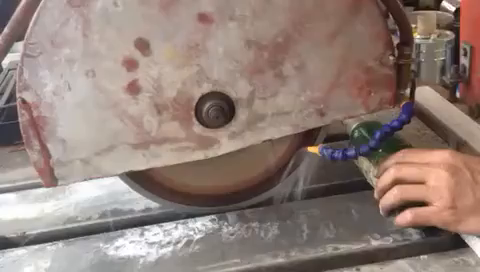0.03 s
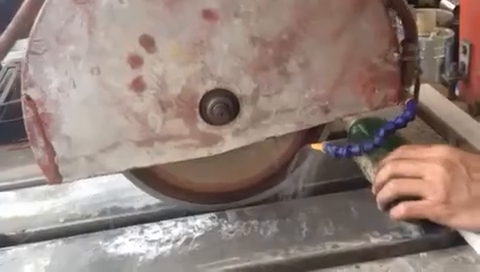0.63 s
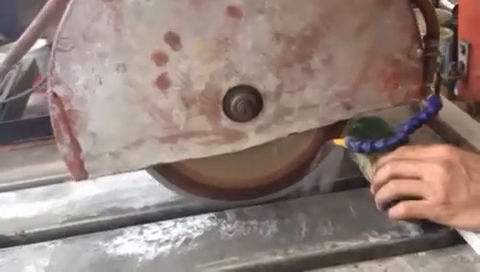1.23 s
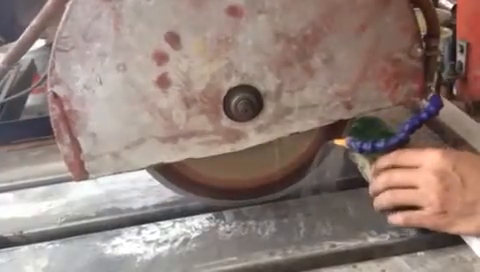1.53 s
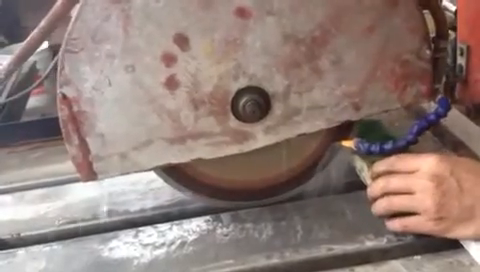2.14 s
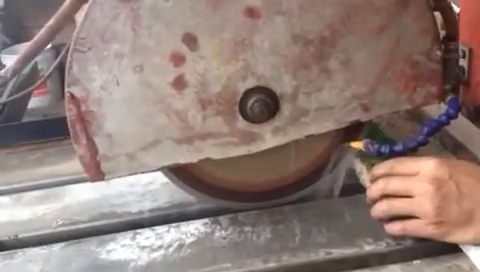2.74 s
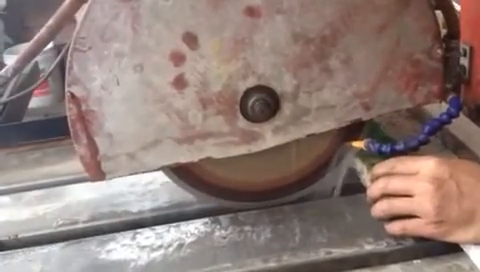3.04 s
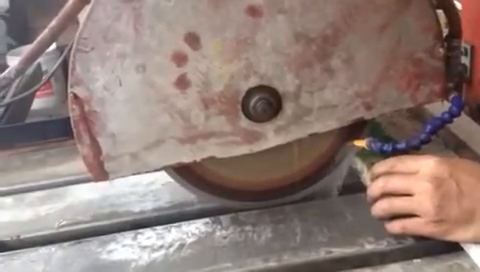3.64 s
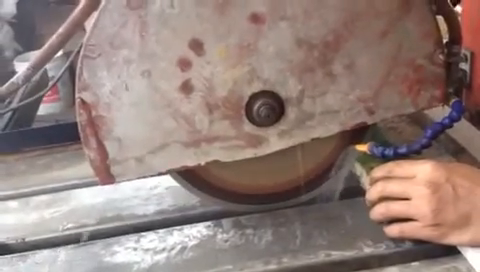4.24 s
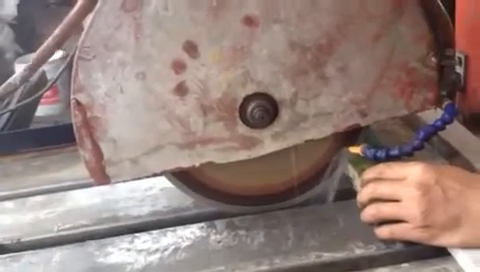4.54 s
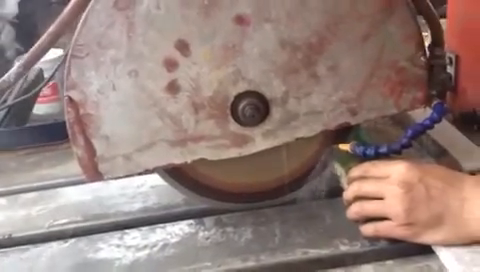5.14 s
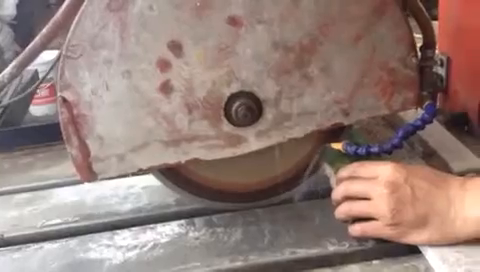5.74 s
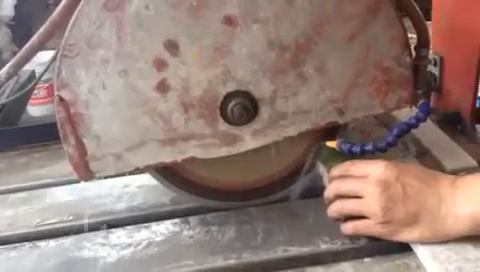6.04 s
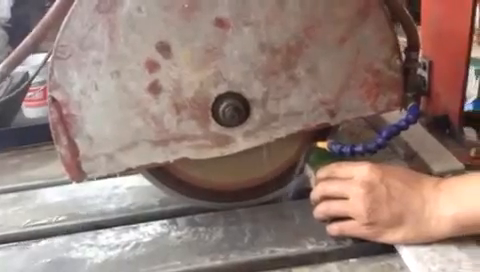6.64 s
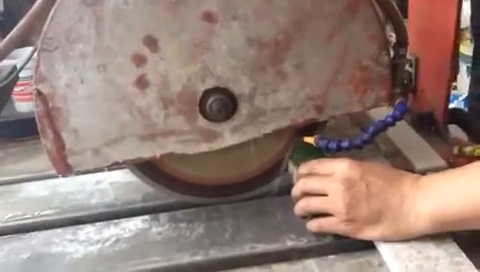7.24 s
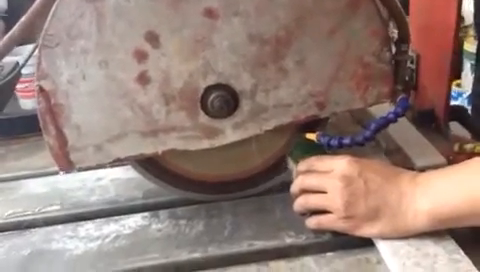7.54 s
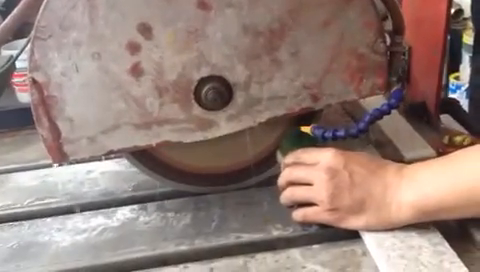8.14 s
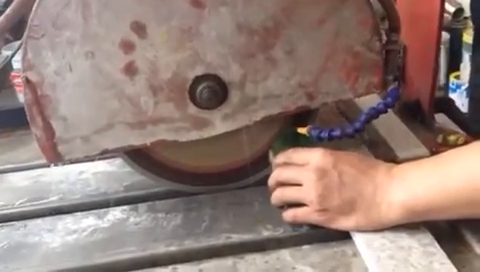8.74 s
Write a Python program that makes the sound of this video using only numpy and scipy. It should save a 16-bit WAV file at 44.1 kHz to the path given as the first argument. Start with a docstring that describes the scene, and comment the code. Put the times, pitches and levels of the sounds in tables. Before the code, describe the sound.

Motor hum and water hiss with a few glass knocks, then a cutting wheel bites a bottle, buzzing and screeching steadily.

```python
"""Cutting a glass bottle on a wet saw

A water-cooled diamond wheel idles while a bottle is slid and knocked into place on the steel table.
Then the rim bites. The same grit passes the glass on every turn, making a buzzing rasp that rings
wheel and bottle, and the bottle's wall sings with a whine that chokes now and then.
The push of the hand (the feed) and the depth of the slot set the level and colour of the cut."""
import sys
import numpy as np
from scipy import signal
from scipy.fft import rfft, irfft, next_fast_len
from scipy.io import wavfile
from scipy.ndimage import uniform_filter1d

SR = 44100
rng = np.random.default_rng(int(sys.argv[2]) if len(sys.argv) > 2 else 0)


def log_audio(samples):
    """Write samples as a 16-bit WAV file to the path given in sys.argv[1]."""
    # one column per channel
    frames = np.atleast_2d(samples).T
    # limit to full scale, then quantise
    limited = np.clip(frames, -1, 1)
    pcm = np.round(limited * 32767).astype(np.int16)
    wavfile.write(sys.argv[1], SR, pcm)


N = 388080

SPIN_HZ = 49.774   # turns of the wheel per second
BITE_S = 2.757   # the cut begins


# Colour of the rasp, and of the slurry (water and ground glass). Each row: pitch in Hz, relative dB.
RASP_COLOUR = [(60, -55), (500, -56), (800, -17.5), (1400, -7.5), (1850, -15), (2400, -19), (3560, -14.5),
               (4300, -6.5), (5150, -17.5), (5700, 1.5), (6800, 4), (7600, 4), (8400, -5), (9300, -13),
               (10400, -44), (15000, -19)]
SLURRY_COLOUR = [(100, -60), (4000, -29), (8000, -4), (9500, 1), (10400, -22), (12000, 1.5), (13500, 6.5),
                 (15200, 10)]
# Ringing notes of the steel wheel and of the bottle.
# Each row: pitch in Hz, width in Hz, relative dB in a shallow cut, relative dB in a deep cut.
WHEEL_NOTES = [(5710, 60, 1.5, 1), (6240, 70, -2.5, -2), (6340, 110, -26.5, -2), (6480, 60, -18, -1),
               (7030, 62, -22, 0), (7270, 85, 5.5, -18), (7780, 140, -26, 1), (8200, 83, -8, -21),
               (8600, 50, -8.5, -5.5), (11270, 56, -18, -15)]
BOTTLE_NOTES = [(845, 6.1, -8, -16), (1077, 140, -7, -11), (1272, 31, -5, -9), (1630, 41, -4, -16.5),
                (2244, 20, -15, -8), (2353, 16.7, 1, -1.5), (2492, 22, -6, -15), (2673, 65, -4.5, -3.5),
                (2897, 380, -4.5, -10), (3143, 41, 3.5, -12), (3410, 52, -13, -18), (3792, 64, -29, -5.5),
                (4175, 57, -23, -7.5), (4450, 75, -27, -12), (4593, 41, -1.5, 1), (4843, 24, 0.5, 2),
                (5740, 42, -24, -7)]
# First catches of the rim on the glass. Each row: start in seconds, level in dB.
RIM_CATCHES = [(2.741, -20), (2.7567, -10.5), (2.777, -19.5)]

def grinding(cutting):
    """The rim rasps on the glass, rings wheel and bottle, and throws off slurry."""
    unsteady_db = 0.45 * drift(14)
    rasp_db = cut_level(shallow_db=-14.5, deep_db=-15.5, feed_share=1) + unsteady_db
    bottle_db = cut_level(shallow_db=-18, deep_db=-19, feed_share=0.78) + unsteady_db
    slurry_db = cut_level(shallow_db=-24.5, deep_db=-25, feed_share=0.83) + unsteady_db
    slurry_db += 0.57 * (seconds() - BITE_S)   # slurry gathers in the slot
    pressure = rim_pressure(high_spots_db=1.5, runout_db=0.96, spot_hz=607)
    # fine grit wears away within a few turns, coarser grit lasts longer
    fine = pressure * grit(turns=7.6, chips_db=-4)
    medium = pressure * grit(turns=18.6, chips_db=-3.5)
    wheel = ring_in_cut(pressure * grit(turns=20, chips_db=5), WHEEL_NOTES, wander_db=3)
    rasp = rms_one(reflected(coloured(fine, RASP_COLOUR)) + from_db(-3) * wheel)
    bottle = ring_in_cut(medium, BOTTLE_NOTES, wander_db=1.38)
    slurry = pressure * noise(SLURRY_COLOUR)
    steady = from_db(rasp_db) * rasp + from_db(bottle_db) * bottle + from_db(slurry_db) * slurry
    steady += swelling_notes(grit(turns=32, chips_db=-11))
    catches = decays(*np.transpose(RIM_CATCHES), t60=0.054) * (rasp + from_db(-6.5) * bottle)
    splash = decays([BITE_S], [-22], t60=0.6) * slurry   # the first bite flings water off the glass
    return cutting * (steady + splash) + catches


# How hard the hand pushes the bottle in. Each row: time in seconds, dB above or below a steady cut.
HAND_FEED = [(2.82, -1.5), (2.89, -5.5), (2.97, -1), (3.04, -3.5), (3.09, -2), (3.18, -4), (3.44, -3),
             (3.8, -1), (4.02, 0.5), (4.2, 0.5), (5.6, -0.5), (6.2, 0.2), (6.47, -0.5), (6.66, 1.9),
             (6.87, -0.8), (7.8, .5), (8.12, 1.8), (8.45, -1), (8.8, 0.8)]

def cut_level(shallow_db, deep_db, feed_share):
    """Level in dB of a layer that follows the depth of the slot and the push of the hand."""
    return shallow_db + slot_depth() * (deep_db - shallow_db) + feed_share * in_time(HAND_FEED)


def slot_depth(start_s=3.33, settle_s=1.34):
    """The rim sinks into the glass ever more slowly, from 0 (shallow) towards 1 (deep)."""
    return 1 - np.exp(-np.maximum(seconds() - start_s, 0) / settle_s)


def rim_pattern(turns):
    """The rim's bumps come back on every turn and wear into new ones over about this many turns."""
    per_turn = round(SR / SPIN_HZ)
    fresh = rng.standard_normal((N // per_turn + 2, per_turn))
    keep = np.exp(-1 / turns)
    worn, _ = signal.lfilter([np.sqrt(1 - keep ** 2)], [1, -keep], fresh[1:], axis=0, zi=keep * fresh[:1])
    return worn.ravel()[:N]


def rim_pressure(high_spots_db, runout_db, spot_hz):
    """The rim presses unevenly: it has high spots and wobbles once a turn (runout)."""
    spots = rms_one(filtered(rim_pattern(turns=48), 2, spot_hz, "low"))
    wobble = np.sin(2 * np.pi * SPIN_HZ * seconds())
    return rms_one(from_db(high_spots_db * spots + runout_db * wobble))


def grit(turns, chips_db):
    """The grinding force: the returning rim bumps plus chips that break off at random."""
    return rms_one(rim_pattern(turns) + from_db(chips_db) * rng.standard_normal(N))


def ring_in_cut(force, notes, wander_db):
    """Grinding rings an object's notes; their strengths wander and shift as the slot deepens."""
    depth = slot_depth()
    out = 0
    for hz, width, shallow_db, deep_db in notes:
        db = shallow_db + depth * (deep_db - shallow_db) + wander_db * drift(2.016)
        out += from_db(db) * resonance(force, hz, width)
    return rms_one(out)


# Echoes off the table and inside the wheel's guard. Each row: delay in seconds, strength as a factor.
STEEL_ECHOES = [(.0023, 0.088), (.0047, 0.24), (.0083, .2)]

def reflected(x):
    """Nearby steel adds very short echoes that colour the sound."""
    return rms_one(x + sum(strength * np.roll(x, round(delay * SR)) for delay, strength in STEEL_ECHOES))


# Single notes that swell and fade in the cut: high screeches and one low hum.
# Each row: start in seconds, end in seconds, pitch in Hz, level in dB.
SWELLING_NOTES = [(3.5, 3.947, 3166, -24.5), (3.926, 4.08, 5740, -23), (3.903, 4.68, 7170, -25.5),
                  (4.303, 4.68, 3204, -26), (4.8, 5.127, 6640, -22), (5.345, 5.952, 5690, -21),
                  (5.45, 6.454, 350, -43), (5.75, 6.25, 6290, -24), (5.81, 5.934, 2660, -23.5),
                  (6.073, 6.222, 2660, -23), (6.333, 6.7, 3780, -29.5), (6.545, 7.258, 2272, -30.5),
                  (6.58, 6.79, 2648, -22), (6.896, 7.4, 6470, -23), (6.988, 8.5, 3865, -30.5),
                  (7.794, 8.2, 6560, -21.5), (8.3, 9.2, 4620, -25.5)]

def swelling_notes(force):
    """The returning grit rings single notes, each of which swells and fades."""
    out = np.zeros(N)
    for start, end, hz, db in SWELLING_NOTES:
        span = slice(int(start * SR), int(end * SR))
        ring = held(resonance(resonance(force[span], hz, width=43), hz, width=43), samples=SR // 12)
        swell = signal.windows.tukey(span.stop - span.start, 0.5)[:len(ring)]
        out[span] += from_db(db) * swell * ring
    return out


# Strength of the whine. Each row: time in seconds, relative level in dB.
WHINE_LEVELS = [(2.8, -40), (2.89, -38), (2.96, -19), (3.28, -21), (3.45, -24.5), (3.9, -27), (4.5, -23),
                (5.1, -20), (5.75, -25), (6.02, -29), (6.5, -26), (7.3, -25.5), (8.1, -29.5), (8.5, -32),
                (8.8, -44)]
# Brief chokes of the whine. Each row: middle in seconds, half length in seconds, loss in dB.
WHINE_CHOKES = [(3.03, 0.044, 12), (3.16, 0.058, 10), (4.01, 0.021, 10), (4.12, 0.019, 12), (4.52, 0.12, 5),
                (5.5, 0.076, 11), (5.86, 0.049, 17), (6.09, 0.032, 9), (6.65, 0.088, 13), (7.47, 0.093, 23)]

def bottle_whine():
    """The bottle's wall sings a whine, with a rougher overtone above it."""
    whine_db = in_time(WHINE_LEVELS) - swells(WHINE_CHOKES) + 0.78
    whine = wall_tone(whine_db, multiple=21, wander_db=0.6, flutter=0.17, rough=0.13,
                      sputter_db=6.5, sputters_per_s=34)
    overtone_db = cut_level(shallow_db=-34, deep_db=-27.5, feed_share=0.39)
    overtone = wall_tone(overtone_db, multiple=53, wander_db=-2.3, flutter=0.7, rough=0.35,
                         sputter_db=10, sputters_per_s=61)
    return whine + overtone


def wall_tone(level_db, multiple, wander_db, flutter, rough, sputter_db, sputters_per_s):
    """A note locked to a multiple of the spin rate; grit roughens it; it sputters as the cut deepens."""
    tone = np.sqrt(2) * np.sin(2 * np.pi * multiple * SPIN_HZ * seconds() + flutter * drift(9.8))
    bumps = rms_one(filtered(grit(turns=81, chips_db=-1), 2, [30, 130], "band"))
    sputter = held(from_db(sputter_db * slot_depth() * np.tanh(drift(sputters_per_s))), samples=SR // 4)
    return from_db(level_db + wander_db * drift(12)) * tone * sputter * (1 + rough * bumps)


# Strength of the frame's drone. Each row: time in seconds, relative level in dB.
FRAME_LOAD = [(2.85, -28), (3.15, -34.5), (3.55, -31), (3.95, -34.5), (5.1, -43.5), (5.7, -36.5),
              (6.3, -49.5), (7.2, -37.5), (8.8, -42.5)]
# Its strong tones. Each row: multiple of the spin rate, relative level in dB.
FRAME_TONES = [(3, -9.5), (4, -24), (5, 5), (6, -12), (7, 1), (12, 2.5), (15, -12), (17, 6.5)]
# Colour of its shaking. Each row: pitch in Hz, relative level in dB.
FRAME_COLOUR = [(30, -50), (60, -42), (100, -47), (150, -3), (250, 13.5), (350, 15), (420, 0.5), (520, -16),
                (600, 10), (680, -6), (780, -26), (1100, -29)]

def frame_drone():
    """The saw's frame buzzes under load, shaken by the coarse shape of the rim."""
    tones = 0
    for multiple, db in FRAME_TONES:
        gain = from_db(db + 2.7 * drift(2.95))
        phase = 2 * np.pi * (multiple * SPIN_HZ * seconds() + rng.random())
        tones += gain * np.sin(phase + 0.23 * drift(8.2))
    shake = coloured(grit(turns=15, chips_db=-19), FRAME_COLOUR)
    return from_db(in_time(FRAME_LOAD)) * (from_db(-4) * rms_one(tones) + from_db(-9.5) * shake)


# The bottle is set down. Each row: start in seconds, clack level in dB, thump level in dB.
BOTTLE_KNOCKS = [(0.468, -29, -50), (0.727, -20.5, -34), (0.747, -18.5, -30), (0.777, -36, -33.5),
                 (1.05, -32, -38), (1.630, -24, -34), (1.648, -21.5, -38), (1.658, -24.5, -35)]
# Colour of a clack. Each row: pitch in Hz, relative level in dB.
CLACK_COLOUR = [(300, -10), (1500, -6), (2600, -2), (3900, 3), (5000, -3), (6400, 5), (7600, 0.5),
                (9500, -8), (15000, -34)]

def knocks():
    """Glass hits steel: a clack that lingers in the room, a thin glassy ring and a table thump."""
    times, clack_db, thump_db = np.transpose(BOTTLE_KNOCKS)
    room_tail = decays(times, clack_db - 13.5, t60=1)
    clack = noise(CLACK_COLOUR) * (decays(times, clack_db, t60=0.046) + room_tail)
    glass = rms_one(resonance(rng.standard_normal(N), hz=6500, width=410))
    ring = glass * decays(times, clack_db - 18, t60=1)
    table = noise([(60, -33), (120, -4), (170, -0.5), (300, -10), (500, -14), (1200, -7.5), (6000, -68)])
    thump = table * decays(times, thump_db, t60=0.34)
    return filtered(clack + ring + thump, 4, 110, "high")


# Pushes of the bottle. Each row: start in seconds, relative level in dB, fade in dB per second.
BOTTLE_PUSHES = [(0.462, -25, 15), (1.04, -25, 25)]
# Notes of the uncut bottle. Each row: pitch in Hz, width in Hz, relative level in dB.
SLIDE_NOTES = [(880, 90, -12), (1736, 39, -3), (2065, 20, -6.5), (2873, 31, -0.5), (3485, 12, -0.5),
               (3730, 14, -8), (4680, 90, -11)]

def sliding(ring_build_s=0.02):
    """Glass pushed over wet steel scrapes, rings and rumbles the table, with squeaks and a last scuff."""
    push = strokes(BOTTLE_PUSHES, hold_s=0.11)
    keep = np.exp(-1 / (ring_build_s * SR))
    build_up = signal.lfilter([1 - keep], [1, -keep], push)   # the glass takes a moment to ring up
    friction = rng.standard_normal(N) * from_db(0.84 * drift(90))
    ring = sum(held(resonance(friction, hz, width), samples=SR // 25) * from_db(db + 2.1 * drift(24.35))
               for hz, width, db in SLIDE_NOTES)
    scrape = noise([(60, -40), (400, -17), (850, 4.5), (1200, -5), (1750, -1), (2400, -6),
                    (5000, -8), (12000, -30)])
    table = rms_one(resonance(resonance(friction, hz=110, width=40), hz=114, width=35))
    drag = push * (from_db(-5) * scrape + from_db(-25.5) * table)
    return drag + from_db(-3.5) * build_up * rms_one(ring) + squeaks(friction) + scuff(friction)


# Squeaks of the bottle. Each row: start in seconds, relative level in dB, fade in dB per second.
BASE_SQUEAKS = [(0.465, -36.5, 45), (1.088, -31.5, 90), (1.35, -42, 50), (1.92, -44, 40), (2.035, -44, 120)]

def squeaks(friction):
    """The bottle's base sticks and slips on the wet steel: a high note with a rasping edge."""
    note = held(resonance(friction, hz=5190, width=17), samples=SR // 25)
    stick_slip = from_db(2.5 * drift(69.4))
    edge = from_db(-5) * rms_one(resonance(friction, hz=5270, width=400))
    return strokes(BASE_SQUEAKS, hold_s=0.055) * (note * stick_slip + edge)


# A scuff just before the cut. Each row: start in seconds, level in dB.
BASE_SCUFFS = [(2.432, -29)]

def scuff(friction):
    """The bottle rubs briefly on the table."""
    rub = rms_one(resonance(resonance(friction, hz=1740, width=510), hz=1800, width=560))
    return decays(*np.transpose(BASE_SCUFFS), t60=0.38) * rub


# Cooling water thrown off the wheel. Each row: time in seconds, relative level in dB.
SPRAY_LEVELS = [(0.65, -34.5), (0.95, -38), (1.25, -34.5), (1.53, -35), (1.8, -40)]
# Colours of the spray and the roar, then the motor's tones. Each row: pitch in Hz, relative dB.
SPRAY_COLOUR = [(60, -50), (1500, -11), (3000, -10), (4200, -4), (5200, -2), (6200, 0.5), (7500, 2.5),
                (8600, -0.5), (10400, -10), (12000, -6.5), (13500, -1.5), (15300, -5.5)]
ROAR_COLOUR = [(30, -50), (60, -28), (90, -39), (130, -9.5), (200, -2), (320, 2), (460, -1.5), (560, -8),
               (780, 1), (1050, -4.5), (1350, -3), (2100, -5.5), (3100, -11.5), (6000, -19), (12000, -35)]
MOTOR_TONES = [(301.5, -46.5), (899.0, -47), (1050, -42.5), (1249, -44), (1297, -61), (1782, -69)]

def idling(cutting):
    """Water hisses off the wheel over the motor's roar and hum; the load of the cut quietens them."""
    spray = from_db(in_time(SPRAY_LEVELS) + 6.5 + 0.5 * drift(60)) * noise(SPRAY_COLOUR)
    roar = from_db(-31.5 + 1.2 * drift(30)) * noise(ROAR_COLOUR)
    hum = 0
    for hz, db in MOTOR_TONES:
        gain = from_db(db - 0.5 + 1.7 * drift(4.2))
        hum += gain * np.sin(2 * np.pi * hz * seconds() + 1.1 * drift(5.4))
    return (spray + roar + hum) * from_db(-8 * cutting)


# Soft low thuds. Each row: middle in seconds, level in dB.
LOW_THUDS = [(4.1, -41.5), (5.94, -48), (7.91, -42), (8.24, -41)]
# Colour of a thud. Each row: pitch in Hz, relative level in dB.
THUD_COLOUR = [(15, -2), (50, -3), (100, -14), (170, 6), (300, -2), (800, -17), (4000, -70)]

def low_thuds(half_length_s=0.078):
    """Soft low thuds are heard at the loudest moments of the cut."""
    return swells([(s, half_length_s, from_db(db)) for s, db in LOW_THUDS]) * noise(THUD_COLOUR)


def from_db(db):
    """Turn decibels into a factor to multiply by."""
    return 10 ** (np.asarray(db) / 20)


def rms_one(x):
    """Scale a sound to an average power of 1."""
    return x / np.sqrt(np.mean(x ** 2) + 1e-20)


def seconds():
    """The time of every sample."""
    return np.arange(N) / SR


def in_time(rows):
    """Join (seconds, value) points with straight lines."""
    return np.interp(seconds(), *np.transpose(rows))


def drift(rate):
    """A random wander of about 1 either way, with `rate` new values a second."""
    points = rng.standard_normal(4000)
    return np.interp(seconds() * rate, np.arange(len(points)), points) * np.sqrt(3 / 2)


def coloured(x, colour):
    """Shape a sound's lows and highs along (Hz, dB) points; the result has power 1."""
    hz, db = np.transpose(colour)
    size = next_fast_len(N)
    bin_hz = np.maximum(np.fft.rfftfreq(size, 1 / SR), 1)
    gains = from_db(np.interp(np.log(bin_hz), np.log(hz), db))
    return rms_one(irfft(rfft(x, size) * gains, size)[:N])


def noise(colour):
    """Random noise with the given colour."""
    return coloured(rng.standard_normal(N), colour)


def filtered(x, order, hz, kind):
    """Keep the lows, the highs or a band; a higher order cuts more steeply."""
    return signal.sosfilt(signal.butter(order, hz, kind, fs=SR, output="sos"), x)


def resonance(x, hz, width):
    """Ring at one pitch; the smaller the width in Hz, the longer the ring."""
    r = np.exp(-np.pi * width / SR)
    feedback = [1, -2 * r * np.cos(2 * np.pi * hz / SR), r * r]
    return signal.lfilter(np.array([1, 0, -1]) * (1 - r * r) / 2, feedback, x)


def held(ring, samples):
    """Even out the level over this many samples, as friction keeps a note going."""
    return ring / np.sqrt(uniform_filter1d(ring ** 2, size=samples) + 1e-12)


def decays(times, levels_db, t60):
    """A level that jumps at each blow, then falls 60 dB in t60 seconds."""
    blows = np.zeros(N)
    blows[np.round(np.array(times) * SR).astype(int)] = from_db(levels_db)
    return signal.lfilter([1], [1, -np.exp(-np.log(1000) / (t60 * SR))], blows + 1e-18)


def strokes(rows, hold_s, grip_s=0.0063):
    """The level of rubbing strokes: a quick grip, a hold, then a steady fade."""
    out = 0
    for start, db, fade_db_per_s in rows:
        age = seconds() - start
        grip = np.clip(age / grip_s, 0, 1)
        out = np.maximum(out, grip * from_db(db - fade_db_per_s * np.maximum(age - hold_s, 0)))
    return out


def swells(rows):
    """Smooth bumps, each given by its middle, half length and height."""
    return sum(height * np.exp(-((seconds() - middle) / half) ** 2) for middle, half, height in rows)


def scene():
    """Saw and bottle reach one microphone close to the wheel's guard."""
    cutting = np.clip((seconds() - BITE_S) / 0.058, 0, 1)   # 0 while idling, 1 in the cut
    saw = cutting * bottle_whine() + idling(cutting) + sliding() + knocks()
    saw += grinding(cutting) + cutting * frame_drone()
    mono = filtered(saw, 4, 80, "high") + low_thuds()   # thin glass and steel give off little bass
    return np.stack([mono, mono])


def record(dry):
    """The microphone opens after a moment, the loudest grit overloads it, and the top treble is cut."""
    open_s, ceiling, hardness, cutoff_hz = 0.12, 0.66, 11, 15350
    opened = dry * (seconds() >= open_s)
    flattened = opened / (1 + np.abs(opened / ceiling) ** hardness) ** (1 / hardness)
    return signal.sosfilt(signal.ellip(12, 0.1, 80, cutoff_hz, fs=SR, output="sos"), flattened)


dry = scene()
out = record(dry)
log_audio(out)
```